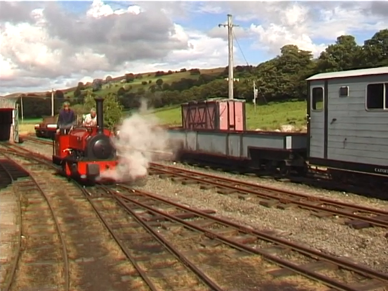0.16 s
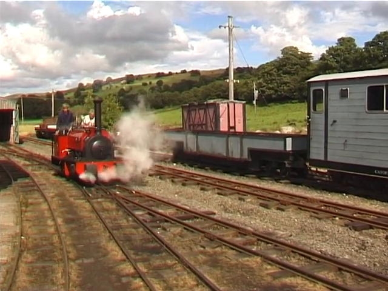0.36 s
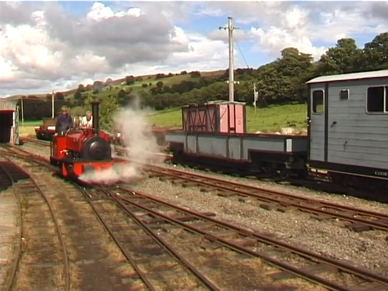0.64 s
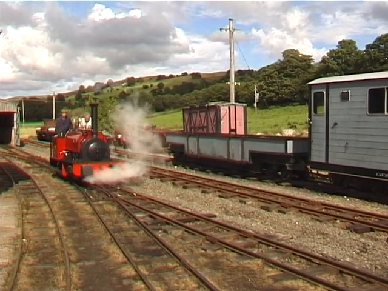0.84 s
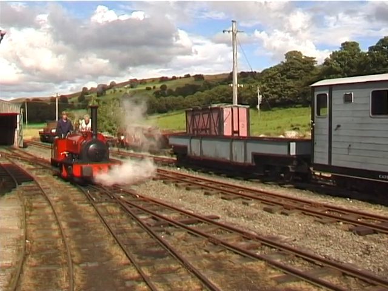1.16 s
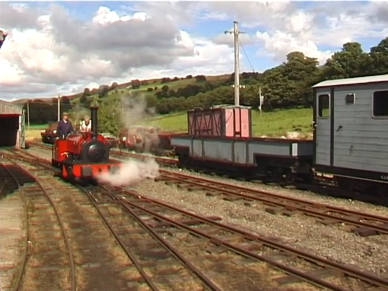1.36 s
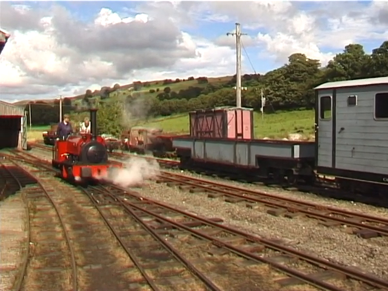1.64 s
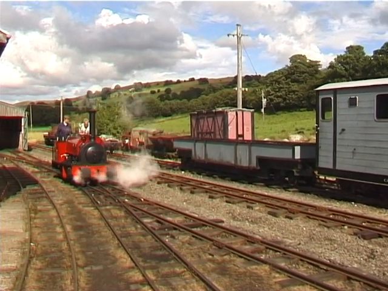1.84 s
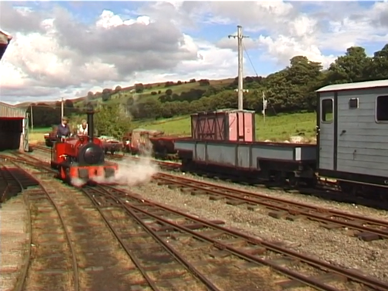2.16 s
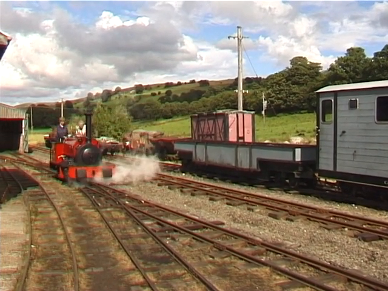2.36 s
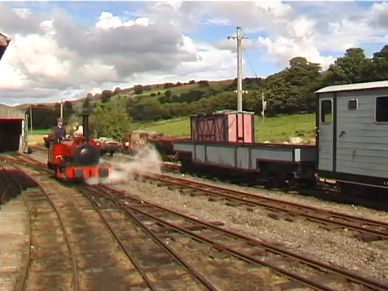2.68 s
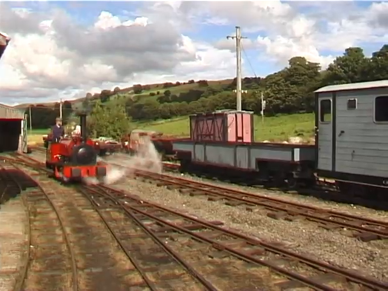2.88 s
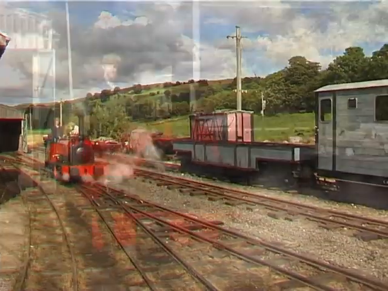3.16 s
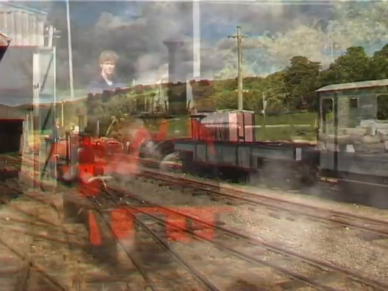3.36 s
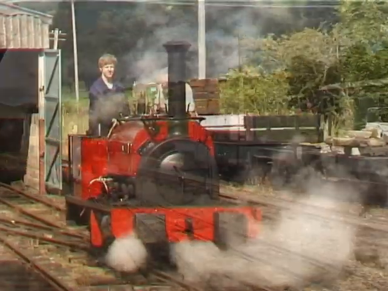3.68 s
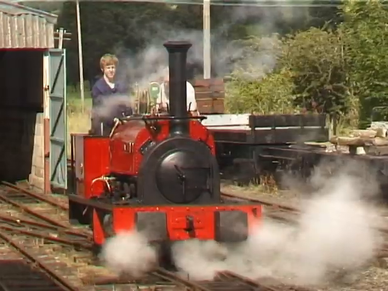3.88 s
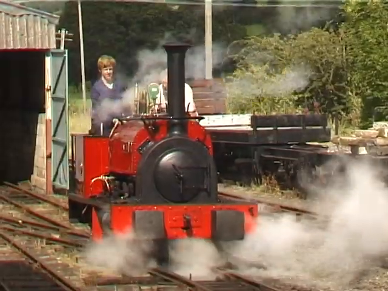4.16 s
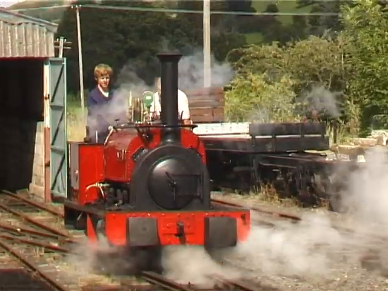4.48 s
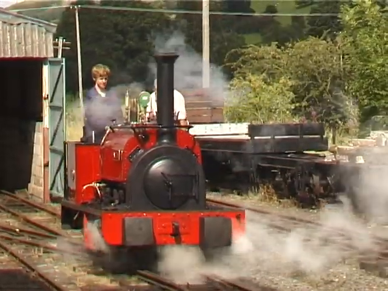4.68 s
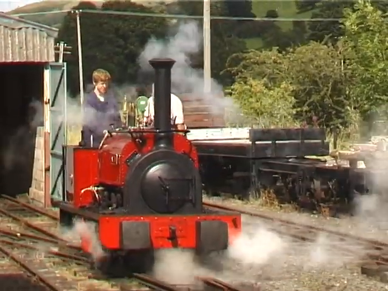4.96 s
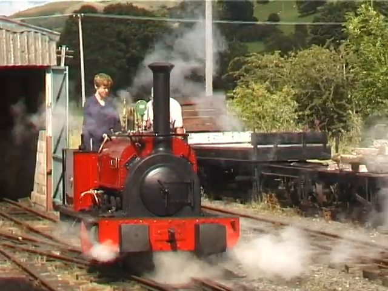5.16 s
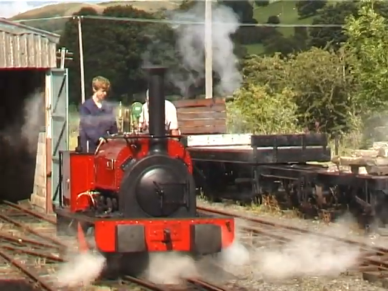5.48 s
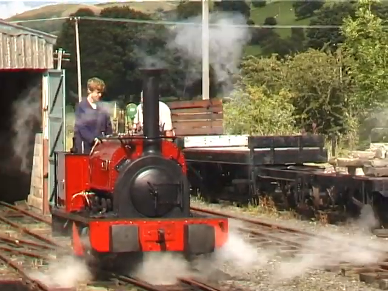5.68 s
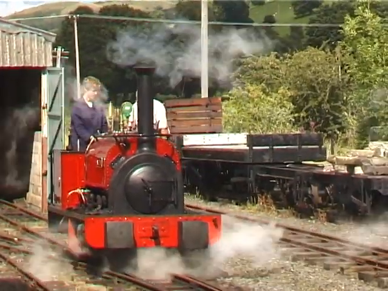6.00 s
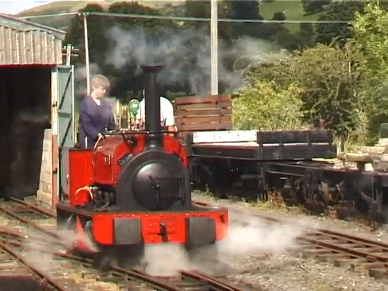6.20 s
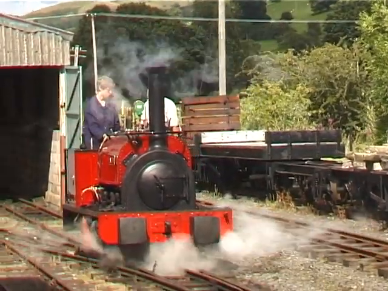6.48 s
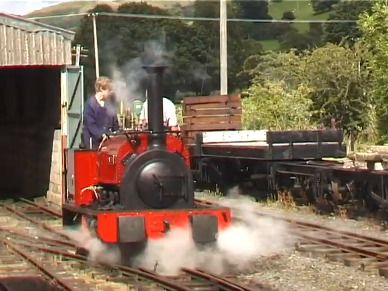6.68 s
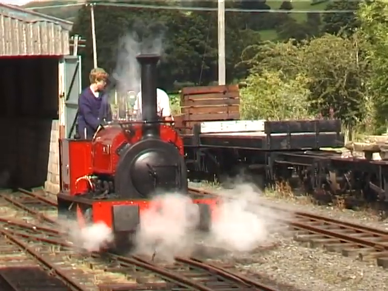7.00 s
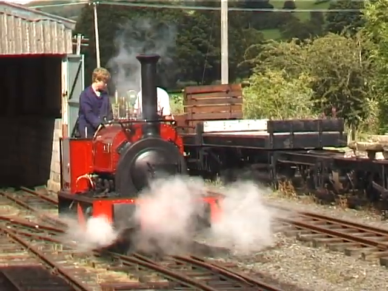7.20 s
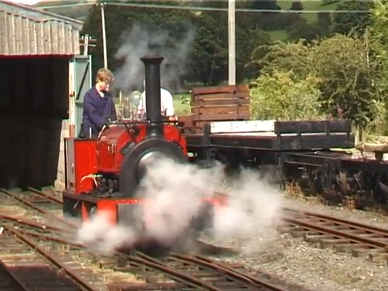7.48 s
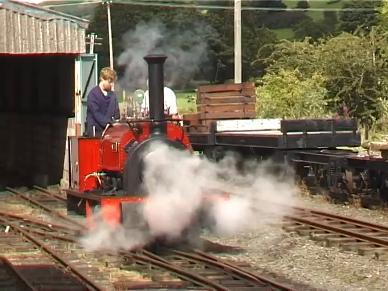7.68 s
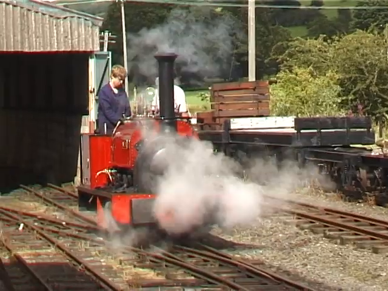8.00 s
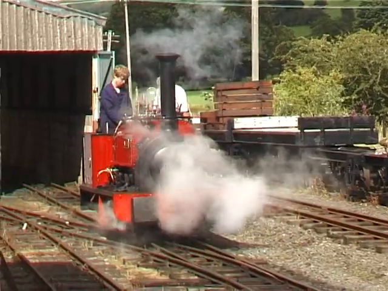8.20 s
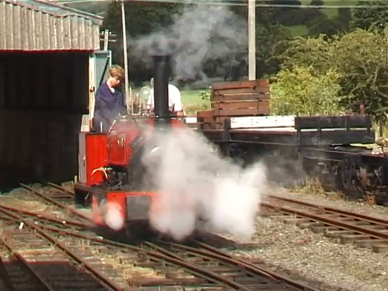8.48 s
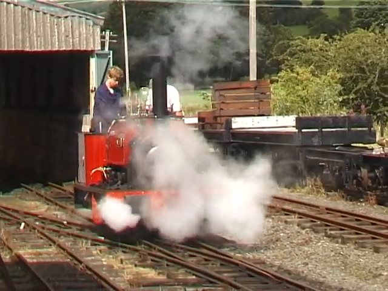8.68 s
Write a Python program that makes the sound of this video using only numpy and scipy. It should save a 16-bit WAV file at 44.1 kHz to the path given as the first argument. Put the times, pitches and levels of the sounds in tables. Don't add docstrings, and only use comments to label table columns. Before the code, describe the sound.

Steam hisses in uneven puffs from a small creeping locomotive, over a low yard rumble, distant engine, wind buffeting and a few dull knocks.

```python
import sys
import numpy as np
from scipy import signal
from scipy.fft import rfft, irfft, next_fast_len
from scipy.io import wavfile
from scipy.ndimage import map_coordinates

SR = 44100
rng = np.random.default_rng(int(sys.argv[2]) if len(sys.argv) > 2 else 0)


def amplitude_ratio(level_db):
    exponent = np.asarray(level_db, float) / 20
    return 10 ** exponent


def materialize(psi):
    bounded = np.clip(np.atleast_2d(psi).T, -1, 1)
    quanta = np.round(bounded * 32767).astype(np.int16)
    wavfile.write(sys.argv[1], SR, quanta)


N = 390264
SIZE = next_fast_len(N, True)
HZ = np.maximum(np.arange(SIZE // 2 + 1) * SR / SIZE, 1)
STEP_S = np.arange(0, N + 64, 64) / SR
FAR_TO_NEAR_S = (3.2, 4.0)


def rms_one(x):
    return x / np.sqrt(np.mean(x ** 2) + 1e-20)


def in_time(rows):
    s, *columns = np.transpose(rows)
    return [np.interp(np.arange(N) / SR, s, c) for c in columns]


def at_hz(points, hz):
    table_hz, table_db = np.array(points).T
    return np.interp(np.log(hz), np.log(table_hz), table_db)


def smooth(values):
    return np.interp(np.arange(N) / SR, STEP_S, values)


def drift(rate):
    pole = np.exp(-80 * np.pi * rate / SR)
    noise = rng.standard_normal(N // 40 + 2002)
    slow = signal.lfilter([1], [1, -2 * pole, pole * pole], noise)[2000:]
    return np.interp(np.arange(N) / 40, np.arange(len(slow)), rms_one(slow))


def coloured(points):
    spectrum = rfft(rng.standard_normal((2, SIZE))) * amplitude_ratio(at_hz(points, HZ))
    return rms_one(irfft(spectrum, SIZE)[:, :N])


def tone(hz):
    return np.sqrt(2) * np.sin(2 * np.pi * np.cumsum(hz) / SR)


def glide(rows, waver_db, waver_rate):
    hz, level_db = in_time(rows)
    t = np.arange(N) / SR
    sounding = (t > rows[0][0]) * (t < rows[-1][0])
    return amplitude_ratio(level_db + waver_db * drift(waver_rate)) * tone(hz) * sounding


def yard(roar_db):
    # pitch_hz, density_db (per Hz)
    yard_colour = [(65, -32), (110, -11), (146, -7), (226, -2), (347, -4), (404, -4.5), (497, -5.5),
                   (1300, -9), (1500, -4.5), (1950, -8.5), (3300, -120)]
    far_db, near_db, follows = -50, -54, 0.26
    far = np.arange(N) < FAR_TO_NEAR_S[1] * SR
    swing_db = roar_db - np.where(far, roar_db[far].mean(), roar_db[~far].mean())
    level_db = np.where(far, far_db, near_db) + follows * swing_db
    return amplitude_ratio(level_db + 10.0 + 0.85 * drift(5.1)) * coloured(yard_colour)


def wind():
    # pitch_hz, density_db (per Hz)
    wind_colour = [(11, -38), (18, -5.5), (48, -1), (85, -0.5), (129, -5), (238, -19), (278, -18),
                   (313, -24), (400, -34), (520, -44), (880, -120)]
    # time_s, level_db
    breeze = [(0, -59), (.5, -60.5), (1.4, -57), (2.0, -62), (2.85, -60), (3.1, -48.5), (3.9, -44),
              (4.24, -55), (4.5, -45), (5.6, -43.5), (6.15, -51.5), (6.8, -48), (7.05, -55), (7.25, -62),
              (7.7, -62), (8.2, -57), (8.85, -64)]
    # peak_s, level_db, half_width_s
    gust_events = [(.59, -47.5, 0.037), (.67, -46, .025), (2.13, -52, .06), (2.44, -56, .04),
                   (2.99, -47, .035), (3.3, -39, 0.048), (3.5, -37.5, 0.031), (3.61, -38, .05),
                   (3.72, -39.5, .035), (3.87, -47, 0.037), (4.08, -51, .06), (4.31, -45, .04),
                   (4.46, -44.5, 0.034), (4.71, -39.5, .03), (5.03, -38.5, 0.035), (5.14, -44.5, .04),
                   (5.62, -51, 0.036), (5.74, -43, .03), (5.85, -44, .05), (6.03, -50, 0.04),
                   (6.32, -45, 0.041), (7.0, -56, .04), (7.11, -49, 0.023), (7.32, -58, .05),
                   (7.55, -56, 0.065), (7.91, -55, 0.052), (8.13, -49, .035), (8.2, -50, 0.013),
                   (8.3, -53, .025)]
    flutter_from_hz, flutter_even_db, flutter_grows = 84, -47, 0.17
    gust_power = sum(amplitude_ratio(db) ** 2 * np.exp(-((STEP_S - s) / half_s) ** 2) for s, db, half_s in gust_events)
    level_db = 10 * np.log10(amplitude_ratio(in_time(breeze)[0]) ** 2 + smooth(gust_power))
    noise = coloured(wind_colour)
    flutter = irfft(rfft(noise, SIZE) / (1 + (flutter_from_hz / HZ) ** 4), SIZE)[:, :N]
    noise = noise + (amplitude_ratio(flutter_grows * (level_db - flutter_even_db)) - 1) * flutter
    return amplitude_ratio(level_db + 8.0 + 1.5 * drift(19.0) + 1.4 * drift(40.0)) * noise


def road_engine():
    # time_s, firing_hz, level_db
    engine_run = [(0, 44.3, -55), (.5, 45.84, -47), (1, 50.65, -46), (1.4, 55.2, -52), (1.9, 59.2, -47.5),
                  (2.64, 68.7, -50.5), (3.08, 73, -44), (3.34, 77.1, -46), (4, 84.5, -49)]
    # multiple, level_db
    engine_orders = [(1, 1), (2, -9), (3, -9), (4, -18.5), (5, -16.5), (6, -19), (7, -26)]
    pipe_hz, width_hz, lift_db = 413, 67, 17.8
    firing_hz, level_db = in_time(engine_run)
    out = 0
    for multiple, db in engine_orders:
        lift = lift_db / (1 + (2 * (multiple * firing_hz - pipe_hz) / width_hz) ** 4)
        out = out + amplitude_ratio(db + lift + 2.0 * drift(4.6)) * tone(multiple * firing_hz)
    return amplitude_ratio(level_db) * out * (np.arange(N) < FAR_TO_NEAR_S[1] * SR)


def far_whine():
    # time_s, pitch_hz, level_db
    whine_curve = [
        (4.9, 262, -70),
        (5.75, 281, -55),
        (6.5, 291, -54),
        (6.9, 296, -56),
        (7.3, 299, -64),
        (8.1, 303, -64),
        (8.3, 304, -75),
    ]
    return glide(whine_curve, 1, 1.6)


def boiler_hum():
    # time_s, pitch_hz, level_db
    hum_curve = [
        (3.4, 79.7, -59),
        (3.8, 80.2, -48),
        (4.2, 79.3, -49),
        (4.55, 80, -41),
        (4.8, 81, -60),
    ]
    return glide(hum_curve, 2.8, 3.3)


def knocks():
    # start_s, peak_db, pitch_hz, t60_s
    knock_events = [(2.099, -39, 135, 0.14), (2.102, -28, 1000, 0.031), (2.128, -36.5, 684, .15),
                    (2.132, -35, 282, .1), (2.17, -38, 250, 0.11), (2.234, -41, 238, 0.13),
                    (2.259, -40, 250, .1), (2.285, -33, 259, 0.058), (3.889, -25.5, 930, 0.034),
                    (3.915, -30, 880, .04), (3.959, -28.5, 708, 0.035), (5.957, -30, 711, 0.029),
                    (6.6, -41, 670, .06), (7.891, -34, 195, 0.14), (7.892, -38, 173, 0.072),
                    (7.895, -44, 255, 0.09), (7.897, -38, 308, 0.11), (7.9, -41, 560, .07),
                    (7.999, -44, 206, 0.14), (8.399, -38.5, 220, .07), (8.452, -37, 254, 0.096),
                    (8.489, -36.5, 207, 0.1), (8.539, -39.5, 218, 0.12), (8.58, -36, 238, 0.05)]
    out, t = np.zeros(N), np.arange(SR // 3) / SR
    muffle = signal.butter(2, [150, 1500], "band", fs=SR, output="sos")
    noise = rng.standard_normal((len(knock_events), len(t)))
    cracks = signal.sosfilt(muffle, noise) * amplitude_ratio(-0.5 - 60 * t / 0.063)
    contact = 1 - np.exp(-t / 0.0029)
    for (s, db, hz, t60), crack in zip(knock_events, cracks):
        pair = np.sin(2 * np.pi * hz * t) + 0.5 * np.sin(2 * np.pi * 1.17 * hz * t)
        ring = contact * amplitude_ratio(db + 7.5) * (amplitude_ratio(-60 * t / t60) * pair + crack)
        at = round(s * SR)
        out[at:at + len(t)] += ring[:N - at]
    return out


def flange_squeak():
    # time_s, pitch_hz, level_db
    squeak_curve = [
        (3.935, 2980, -48),
        (3.95, 3010, -31),
        (3.97, 3050, -33),
        (3.985, 3120, -28),
        (3.998, 3150, -31),
        (4.002, 3150, -70),
    ]
    upper = [(s, 1.11 * hz, db) for s, hz, db in squeak_curve]
    return glide(squeak_curve, 3.0, 80.0) + 0.57 * glide(upper, 4.0, 84.0)


def burst(s, open_s, fall_db_per_s=37.5):
    pop_s, pop_share, sag_db_per_s = 0.009, 0.4, 4
    t = np.maximum(STEP_S - s, 0)
    rise_s = min(0.057, 0.3 * open_s)
    swell = 1 - pop_share * np.exp(-t / pop_s) - (1 - pop_share) * np.exp(-t / rise_s)
    loss_db = sag_db_per_s * t + fall_db_per_s * np.maximum(t - open_s, 0)
    return (swell * amplitude_ratio(-loss_db)) ** 2


def glands():
    # start_s, open_s, level_db
    far_spits = [(.24, .35, -35.5), (.65, .4, -40.5), (1.07, .06, -39), (1.7, .3, -43), (2.05, .3, -48),
                 (3.14, .22, -37.5), (3.46, .55, -37.5)]
    # start_s, open_s, level_db
    near_spits = [(2.915, 0.088, -39), (3.9, .22, -40), (4.32, 0.23, -38), (5.14, 0.31, -40.5),
                  (5.64, 0.18, -40), (6.08, .25, -47), (6.55, .18, -46), (6.9, .15, -46), (7.17, 0.15, -48),
                  (7.75, .2, -48), (8.0, .1, -50), (8.18, .1, -44), (8.28, .1, -40), (8.42, .15, -43),
                  (8.6, .35, -39.5)]
    far_seep_db, near_seep_db, fade_db_per_s = -41, -44.5, 1.5
    spit_fall_db_per_s = 49
    since = STEP_S - FAR_TO_NEAR_S[1]
    far = sum(amplitude_ratio(db) ** 2 * burst(s, open_s, spit_fall_db_per_s) for s, open_s, db in far_spits)
    near = sum(amplitude_ratio(db) ** 2 * burst(s, open_s, spit_fall_db_per_s) for s, open_s, db in near_spits)
    seep_db = np.where(since < 0, far_seep_db, near_seep_db - fade_db_per_s * since)
    return smooth(10 * np.log10(far * (since < 0) + near + amplitude_ratio(seep_db) ** 2))


def voiced(db, depth_db, bright_db, rush_db=0):
    depth = np.outer((0.97, 0.23, 0.12, 0.15), depth_db)
    bright = np.outer((0, 0, 0, 1.0), bright_db)
    rush = np.outer((0, 1, 0, 0), rush_db)
    return amplitude_ratio(db + depth + bright + rush) ** 2


def jets():
    # start_s, open_s, hiss_db, depth_db, brightness_db
    far_puffs = [(0.0, .12, -37.5, 0, -2), (.222, 0.32, -31, 5, 1), (.68, 0.42, -39, 6, -4),
                 (1.04, 0.1, -36.5, 3, 3), (1.47, 0.11, -35.5, -2.5, -5), (1.685, 0.27, -30.5, 0, -1),
                 (2.1, 0.18, -40.5, 4.5, 3), (2.42, 0.16, -37, 0, 2), (3.09, 0.092, -32.5, 1, 1),
                 (3.16, 0.25, -31.5, 2, 1), (3.45, 0.26, -31.5, 0.5, 1.5), (3.76, .3, -38, 3.5, 2.5)]
    # start_s, open_s, hiss_db, depth_db, brightness_db
    near_puffs = [(2.915, 0.02, -34, 4.5, -0.5), (3.5, .6, -35, -3.5, -3), (4.34, 0.19, -38.5, 4, 1.5),
                  (5.115, 0.16, -31.5, -6, -1.5), (5.28, 0.18, -35, -4, 0.5), (5.52, .14, -40.5, -9, 0),
                  (5.74, 0.14, -41.5, -6, 3.5), (6.05, 0.12, -39, -4, -1), (6.23, 0.067, -39.5, 0, -2),
                  (6.55, 0.26, -39, -4, -4.5), (6.87, 0.24, -37.5, 4, 0), (7.45, 0.61, -46, 4, 0),
                  (8.0, 0.29, -49, -13, -4), (8.18, 0.11, -36.5, 1.5, -0.5), (8.265, 0.15, -32, -6, 3.5),
                  (8.5, 0.13, -33.5, -3, -3), (8.6, .4, -30, -1, 0)]
    # time_s, hiss_db, depth_db, brightness_db, rush_db
    seep_curve = [(0, -39.5, 6, 4, 3), (.21, -40, 4.5, 2.5, 5), (.75, -39, -2, 6, 3.5),
                  (1.4, -37, 0.5, 3, 2), (1.67, -41, 2, 1.5, 2), (2.2, -39, 3, 1.5, 1.5),
                  (2.8, -39, 3, 1.5, 1.5), (3.99, -37, 2, -3.5, 0.5), (4.01, -37.5, -0.5, 0.5, 0.5),
                  (5.1, -36.5, -1.5, -4, 0), (5.9, -37.5, -0.5, -4, -1.5), (6.5, -40, -3.5, -3.5, -1),
                  (7.38, -46, 4.5, 0, 4), (8.1, -41.5, 0, 0.5, 0), (8.85, -34.5, -1, -1, 3)]
    far = sum(voiced(*voice) * burst(s, open_s) for s, open_s, *voice in far_puffs)
    far = far * (STEP_S < FAR_TO_NEAR_S[1])
    near = sum(voiced(*voice) * burst(s, open_s) for s, open_s, *voice in near_puffs)
    seep = voiced(*(column[::64] for column in in_time(seep_curve)))
    seep = np.pad(seep, ((0, 0), (0, len(STEP_S) - seep.shape[1])), "edge")
    return [smooth(10 * np.log10(power)) for power in far + near + seep]


def whistles(hiss_db):
    # pitch_hz, width_hz, level_db (re hiss)
    nozzle_tones = [
        (4950, 160, -11.5),
        (1800, 150, -22),
    ]
    out = 0
    for hz, width_hz, db in nozzle_tones:
        resonance = 1 / (1 + (2 * (HZ - hz) / width_hz) ** 2)
        narrow = irfft(rfft(rng.standard_normal(SIZE)) * resonance, SIZE)[:N]
        out = out + amplitude_ratio(db + 2 * drift(4)) * rms_one(narrow)
    return amplitude_ratio(hiss_db) * out


def patches(hz, s, width_hz, length_s):
    grid = rng.standard_normal((400, 400))
    where = np.meshgrid(hz / width_hz, s / length_s, indexing="ij")
    return rms_one(map_coordinates(grid, where, order=1, mode="wrap"))


def steam(jet_levels, eddy_db, fine_db, gust_db):
    control_hz = (1820, 3000, 5270, 9150)
    # pitch_hz, density_db (per Hz)
    far_jet = [(530, -19.5), (900, -12), (1310, -10), (1870, -2), (2330, -8), (2900, -1.5), (4260, -3),
               (5070, 2.5), (8120, -5.5), (9670, -1.5), (11300, -7), (12300, -17), (16000, -38),
               (22000, -120)]
    # pitch_hz, density_db (per Hz)
    near_jet = [(530, -49), (900, -17), (1290, -15), (1430, -7.5), (1750, -1), (2000, -2.5), (2280, -10),
                (2660, -1), (3730, -4), (4070, -6.5), (5070, 3.5), (6960, -3), (8860, -5), (9560, -1),
                (12300, -8.5), (16000, -42), (22000, -120)]
    # pitch_hz, density_db (per Hz)
    gland_colour = [(11000, 1), (12200, -1), (13300, 0), (14300, -4), (15700, -8.5)]
    glands_from_hz = 11630
    hz, s, frames = signal.stft(rng.standard_normal((2, N)), SR, nperseg=1024, noverlap=768)
    hz = np.maximum(hz, 1)
    at = np.clip((s * SR).astype(int), 0, N - 1)
    glands_db = glands()[at]
    near = np.interp(s, FAR_TO_NEAR_S, [0, 1])
    colour = np.outer(at_hz(far_jet, hz), 1 - near) + np.outer(at_hz(near_jet, hz), near)
    where = np.interp(np.log(hz), np.log(control_hz), np.arange(4))
    weights = np.clip(1 - np.abs(where[:, None] - np.arange(4)), 0, 1)
    jets_db = weights @ [db[at] for db in jet_levels]
    top = np.clip((hz[:, None] - glands_from_hz) / 900 + .5, 0, 1)
    leaks_db = glands_db + at_hz(gland_colour, hz)[:, None] - 0.5
    level_db = (1 - top) * (jets_db + colour) + top * leaks_db
    eddies = eddy_db * patches(hz, s, 1040, .12)
    grain = fine_db * patches(hz, s, 70.13, .07)
    mottle = eddies + grain + gust_db * drift(4.1)[at]
    shaped = frames * amplitude_ratio(level_db + mottle + 14.5)
    return signal.istft(shaped, SR, nperseg=1024, noverlap=768)[1][:, :N]


def leak(source, stray):
    leak_db, leak_hz, top_hz = -7.0, 490, 13000
    stray_db, stray_rise_hz = -8.0, 14000
    low_pass = -amplitude_ratio(leak_db) / (1 + 1j * HZ / leak_hz)
    faithful = rfft(source, SIZE) / (1 + (HZ / top_hz) ** 2)
    rise = np.sqrt(1 + (HZ / stray_rise_hz) ** 2) / (1 + (HZ / 14200) ** 16)
    noisy = rfft(stray, SIZE) * amplitude_ratio(stray_db) * rise
    return irfft(low_pass * (faithful + noisy), SIZE)[:N]


def scene():
    jet_levels = jets()
    roar_db, _, hiss_db, _ = jet_levels
    lines = road_engine() + boiler_hum() + far_whine() + flange_squeak() + knocks() + whistles(hiss_db)
    air = steam(jet_levels, eddy_db=0.56, fine_db=1.84, gust_db=0.53) + yard(roar_db)
    air = air + lines * [[1], [0]]
    gusts = wind()
    crossing = air + amplitude_ratio(-4.2) * gusts
    return np.array([air[0] + gusts[0], leak(*crossing)])


def band_limit(x):
    return signal.sosfilt(signal.butter(12, 15750, fs=SR, output="sos"), x)


def record(dry):
    cutoff_hz, scan_hz, scan_db = 15750, 15625, -78
    both = irfft(rfft(dry, SIZE) * (HZ < cutoff_hz), SIZE)[:, :N]
    both[1] += amplitude_ratio(scan_db) * tone(np.full(N, scan_hz))
    return band_limit(both)


dry = scene()
out = record(dry)
materialize(out)
```